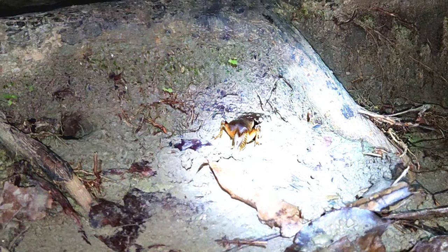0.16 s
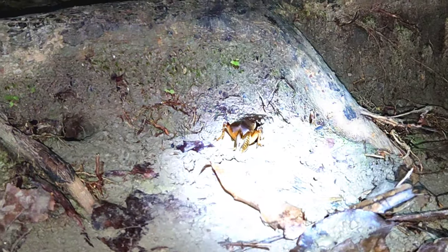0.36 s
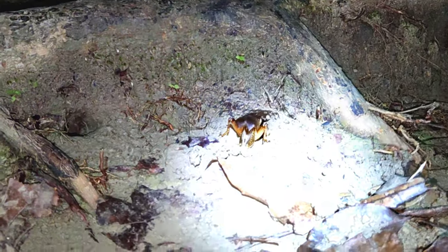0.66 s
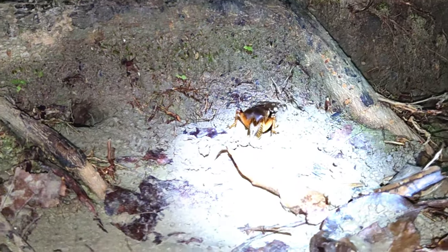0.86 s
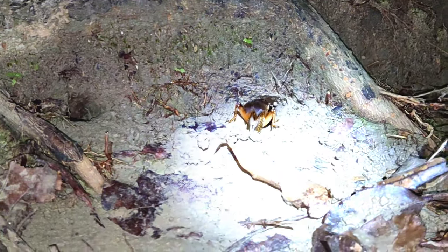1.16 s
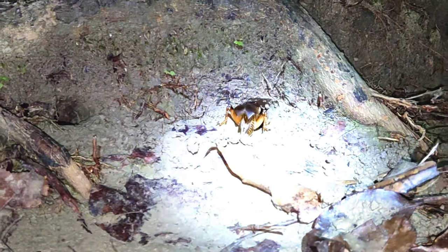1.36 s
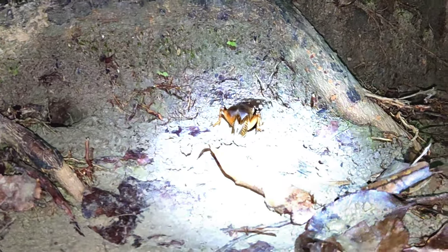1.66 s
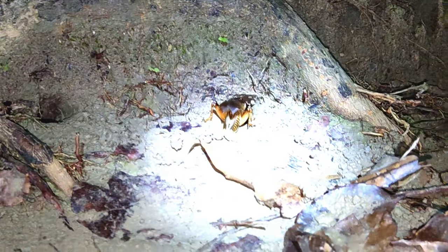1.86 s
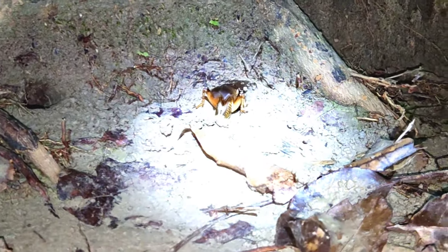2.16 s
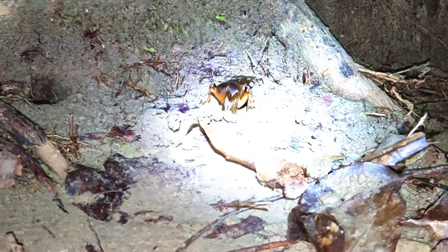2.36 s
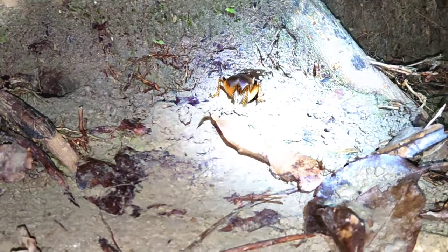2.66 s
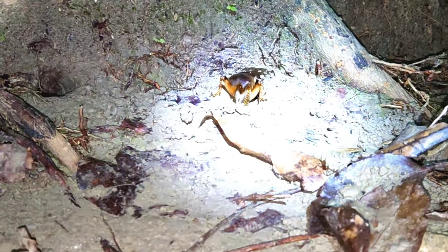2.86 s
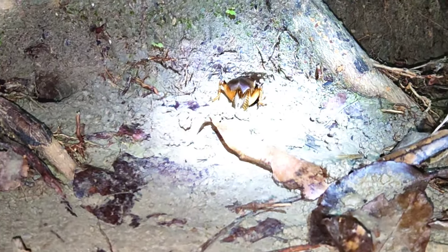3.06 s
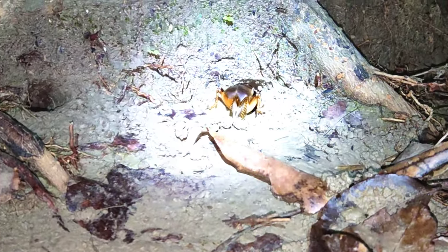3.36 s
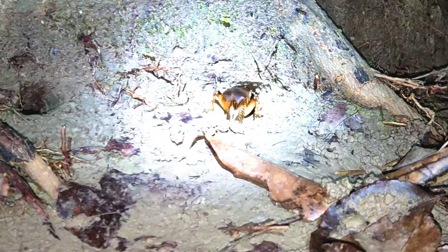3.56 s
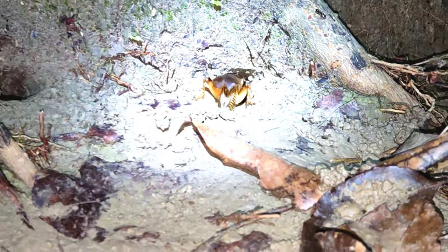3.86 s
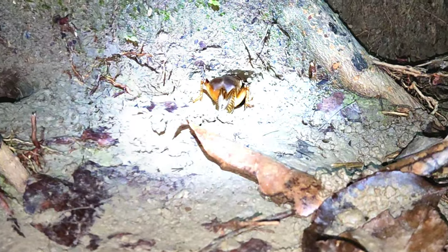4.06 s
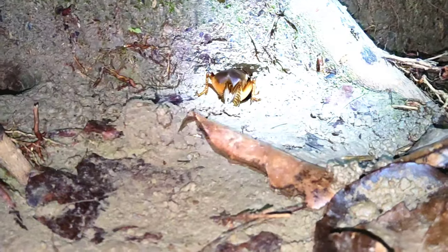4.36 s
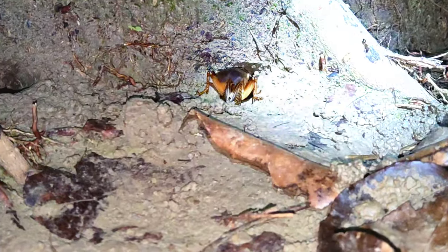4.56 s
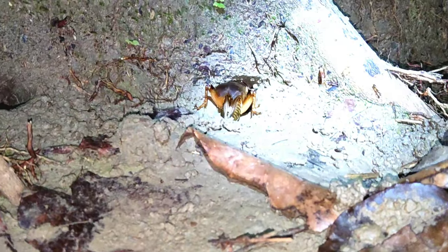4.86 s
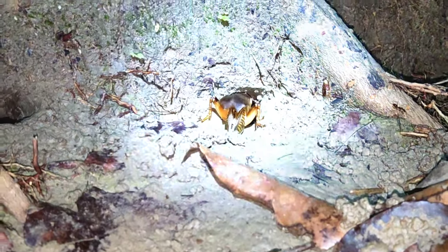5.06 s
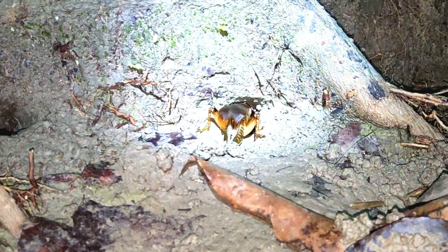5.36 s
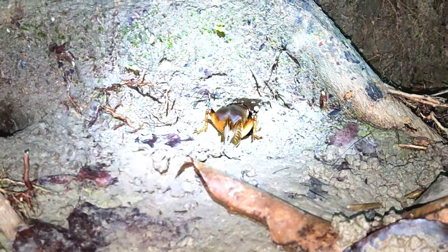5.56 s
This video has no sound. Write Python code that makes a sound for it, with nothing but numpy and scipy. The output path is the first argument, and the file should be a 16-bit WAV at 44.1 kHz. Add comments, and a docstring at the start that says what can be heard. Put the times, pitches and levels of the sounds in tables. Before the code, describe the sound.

From 0 seconds to the end at about 5.7 seconds, a mole cricket sings at its burrow on bare ground at night, very close to hand-held microphones. The song is a loud, unbroken, piercing buzz near 4 kHz, made of about 57 tiny falling chirps a second, too fast to separate, so it sounds like one rough, steady trill with a low hum at the wing-beat rate. Overload adds bright, fizzy overtones and a dry rasp. At about 0.75 to 0.82 seconds, three soft low thumps run together on the right as a brief bump with a short dull rustle. Faint bass flutter swells on the right around 1.4 and again around 4.5 seconds. The roughness varies subtly, slightly less even around 1.5 to 2.3 seconds, and the stereo balance drifts gently. Under it lie thin hiss and a faint, throbbing low rumble, a little stronger around 4 seconds. There is barely any echo.

```python
"""At the mouth of its burrow at night, a mole cricket sings very close to two hand-held microphones.
Each wing closing drags a scraper over a toothed file: a falling chirp near 4 kHz, 57 times a second.
Its song is a swept sine with noise for the scrape; soft clipping adds overtones and a low buzz.
On the right there are three soft low thumps and two spells of bass flutter, made of Gaussian pulses.
Decaying noise gives the song a short haze; filtered noise gives a thin hiss and a throbbing low rumble."""
import sys
import numpy as np
from scipy import signal
from scipy.fft import rfft, irfft, next_fast_len
from scipy.io import wavfile
from scipy.ndimage import map_coordinates

SR = 44100
rng = np.random.default_rng(int(sys.argv[2]) if len(sys.argv) > 2 else 0)


def unload_wav(signal):
    """Save mono or channel-first audio to the path in sys.argv[1] as 16-bit WAV at rate SR, clipped to [-1, 1]."""
    wavfile.write(
        sys.argv[1],
        SR,
        np.round(np.clip(np.atleast_2d(signal).T, -1, 1) * 32767).astype(np.int16),
    )


N = 251811

FIRST_STROKE_S = 0.0138
# the wing beat quickens a little as the song goes on
BEAT_HZ, BEAT_GAIN_HZ_PER_S = 57.06, 0.024


def amp(db):
    """Amplitude ratio of a level: 20 dB is a factor of ten."""
    return 10 ** (np.asarray(db) / 20)


def unit(x):
    """Normalization: x scaled to an rms of 1 over all its samples."""
    return x / np.sqrt(np.mean(x ** 2) + 1e-20)


def curves(rows, at):
    """Linear interpolation: each column after the first, read at the given values of the first."""
    position, *columns = np.transpose(rows)
    return [np.interp(at, position, column) for column in columns]


def filtered(x, response):
    """Linear filtering: the spectrum of x times a response of frequency in Hz."""
    size = next_fast_len(N + 8192)  # padded against wrap-around
    spectrum = rfft(x, size) * response(np.fft.rfftfreq(size, 1 / SR))
    return irfft(spectrum, size)[..., :N]


def noise(spectrum):
    """Spectral shaping: two unrelated Gaussian noises, joint rms 1, from rows of (Hz, relative dB)."""
    corner_hz, level_db = np.transpose(spectrum)

    def response(hz):
        return amp(np.interp(np.log(hz + 1), np.log(corner_hz), level_db))

    return unit(filtered(rng.standard_normal((2, N)), response))


def delayed(x, seconds):
    """Propagation delay: x read at earlier, fractional sample positions; the delay may move."""
    return map_coordinates(x, [np.arange(N) - seconds * SR], order=5, mode="nearest")


def strokes(t):
    """Phase accumulation of the beat rate: each sample's stroke number and age (s) in that stroke."""
    # how unevenly the scraper catches: time_s [s], scatter_ms [ms, standard deviation]
    slip = [(0, 0.06), (.3, 0.0062), (1.15, 0.0074), (1.55, 0.052), (2.3, .04), (2.7, 0.016), (5.7, .016)]
    beat_hz = BEAT_HZ + BEAT_GAIN_HZ_PER_S * t
    beats = np.cumsum(beat_hz) / SR
    beats += 1 - np.interp(FIRST_STROKE_S, t, beats)  # stroke 1 is due at FIRST_STROKE_S
    number = beats.astype(int)
    scatter = rng.standard_normal(number[-1] + 1)[number]
    late_ms = scatter * curves(slip, t)[0]
    return number, (beats - number) / beat_hz - late_ms / 1000


def cricket(t, pitch_scatter=0.0011, size_scatter_db=0.32, tail_scatter_db=0.87, rasp_db=-39,
            catch_db=-32, catch_s=0.0017, wing_low_hz=2900, wing_high_hz=4500):
    """Stridulation: tooth impacts drive the wings at the tooth rate; friction adds a tick and a rasp."""
    # one stroke, the scraper slowing along the file:
    # age_s [s since it catches], tooth_hz [Hz, mean], level_db [dB, relative]
    stroke = [(0, 3943, -38.5), (.0005, 3950, -8.5), (.0011, 3910, -2), (.0022, 3890, -1.6),
              (.0038, 3801, 1), (.0062, 3749, -1.78), (.008, 3657, -1), (.0095, 3596, -3),
              (.011, 3416, -12), (.0128, 3547, -16.5), (.015, 3634, -27.5), (.0175, 3584, -24.5)]
    # the singer's effort: time_s [s], effort_db [dB]
    effort_table = [(0, -0.82), (1.2, -1), (2.3, -0.03), (3, -0.72), (3.7, -1.04), (4.4, -1), (5.7, -0.68)]
    # scrape of the file: frequency_hz [Hz], level_db [dB per Hz, relative]
    rasp_spectrum = [(1000, -3), (2500, 4.5), (3600, 5), (5200, 13.5), (6300, 5), (8300, 12.5), (9500, 6),
                     (11500, -42), (12900, -54), (15000, -49), (16000, -58)]

    number, age = strokes(t)
    speed, size, tail = rng.standard_normal((number[-1] + 1, 3))[number].T

    # the tooth rate sums to a count of teeth passed, one cycle per tooth
    span = np.arange(-SR // 500, SR // 50) / SR
    teeth = np.cumsum(curves(stroke, span)[0]) / SR
    phase = 2 * np.pi * np.interp(age, span, teeth) * (1 + pitch_scatter * speed)

    # the scraper lets go a little differently each time
    release = np.clip(age / stroke[-3][0], 0, 1) ** 4
    scatter_db = size_scatter_db * size + tail_scatter_db * tail * release
    force = amp(curves(stroke, age)[1] + scatter_db)

    def wing_radiation(hz):
        """Small wings radiate little away from their resonance."""
        return (1 - np.exp(-(hz / wing_low_hz) ** 8)) / (1 + (hz / wing_high_hz) ** 20)

    song = filtered(force * np.sin(phase), wing_radiation)

    catch = np.exp(-(age / catch_s - 1) ** 2)
    tick_spectrum = [(2500, -19.5), (4200, -5.5), (5500, -7.0), (6500, -13), (9000, -9.5), (13000, -29)]
    tick = amp(catch_db) * catch * noise(tick_spectrum)
    rasp = amp(rasp_db) * force * noise(rasp_spectrum)
    effort = amp(curves(effort_table, t)[0])
    return effort * song, effort * (rasp + tick)


def flutter(t, width_s=0.0023):
    """Subharmonic pulsing: a dull pulse about the start of every second stroke, swelling in spells."""
    # spells of bass flutter: middle_s [s], half_length_s [s], peak_db [dB, relative]
    spells = [(1.36, 0.19, -37), (4.55, .3, -40)]
    number, age = strokes(t)
    # time from the nearest start of an odd-numbered stroke
    apart = np.where(number % 2, age, 1 / BEAT_HZ - age)
    swell = sum(amp(db) * np.exp(-((t - middle) / half) ** 2) for middle, half, db in spells)
    return -swell * np.exp(-(apart / width_s) ** 2)


def thumps(t, width_s=0.0011, rustle_db=-17, rustle_s=0.098):
    """Low thumps: short Gaussian pulses, each trailing an exponentially decaying low-frequency noise."""
    # soft low thumps: peak_s [s], peak_db [dB, relative]
    pulses = [(0.7498, -27), (0.7851, -31), (0.8203, -31)]
    pulse = sum(amp(db) * np.exp(-((t - s) / width_s) ** 2) for s, db in pulses)
    trail = sum(amp(db) * (t > s) * np.exp(-np.abs(t - s) / rustle_s) for s, db in pulses)
    rustle = noise([(25, 12), (150, 6.5), (700, -30.5), (2000, -42.5)])[0]
    return amp(rustle_db) * trail * rustle - pulse


def haze(song, t60_s=0.33):
    """Decaying noise convolution: a short haze fills the gaps between strokes, unlike at each microphone."""
    t = np.arange(SR // 2) / SR
    tail = rng.standard_normal((2, len(t))) * amp(-60 * t / t60_s)
    tail /= np.linalg.norm(tail, axis=1, keepdims=True)  # unit energy
    return signal.fftconvolve(song[None], tail, axes=1)[:, :N]


def background(t, air_db=-32.0, rumble_db=4.5, rumble_left_db=-5,
               throb_db=7, throb_s=0.005, throb_width_s=0.009):
    """Amplitude modulation of noise: a rumble throbs with the wing beat under a steady hiss."""
    # thin steady hiss: frequency_hz [Hz], level_db [dB per Hz, relative]
    hiss_spectrum = [(300, -11), (1600, -11.5), (2600, -5), (3300, 13.5), (5000, 6), (6200, -6), (7600, 10),
                     (9400, -5), (11200, 6.5), (12200, -13), (13000, -41), (14700, -1), (15900, -17)]
    # low rumble: frequency_hz [Hz], level_db [dB per Hz, relative]
    rumble_spectrum = [(20, -4), (35, -1), (90, 7.5), (150, 5.5), (220, -1.5), (500, -2), (850, -1.5),
                       (1300, -10.5), (2200, -27), (4000, -47)]
    # course of the rumble: time_s [s], level_db [dB, relative]
    rumble_course = [(0.1, -60), (0.73, -56.5), (0.74, -51), (0.88, -55.5), (2.49, -55), (2.9, -57.5),
                     (4.07, -52), (5.6, -56)]
    age = strokes(t)[1]
    throb = throb_db * np.exp(-((age - throb_s) / throb_width_s) ** 2)
    rumble = amp(rumble_db + curves(rumble_course, t)[0] + throb) * noise(rumble_spectrum)
    sides = amp([[rumble_left_db], [0]])  # stronger on the right
    return amp(air_db) * noise(hiss_spectrum) + rumble * sides


def scene(song_db=4, left_db=-3, ground_echo=0.083, haze_db=-34):
    """Superposition: the song leads on the left, joined there by a bounce off the ground."""
    # the swaying microphones: time_s [s], left_lead_ms [ms], left_extra_db [dB]
    sway = [(0, .076, 0.5), (1.25, 0.065, 1.16), (2, 0.075, -0.5), (2.3, 0.1, 0), (2.8, 0.082, 1),
            (3.85, 0.069, 0.5), (4.3, 0.084, 2), (5.2, 0.078, -0.7), (5.7, .1, -3.5)]
    t = np.arange(N) / SR
    song, scrape = cricket(t)
    lead_ms, balance_db = curves(sway, t)
    bounce = delayed(song, 0.0024)
    left = amp(left_db + balance_db) * delayed(song + ground_echo * bounce, -lead_ms / 1000)
    right = song + thumps(t) + flutter(t)
    near = np.array([left, right]) + scrape
    return amp(song_db) * (near + amp(haze_db) * haze(song)) + background(t)


def overload(x, lopsided, top=1.0, hardness=5, skew_power=8):
    """Saturation: peaks flatten symmetrically; an even power law gives the lopsided part."""
    fine = signal.resample_poly(x, 4, 1)  # fourfold rate limits aliasing
    flat = fine / (1 + np.abs(fine / top) ** hardness) ** (1 / hardness)
    skew = lopsided * np.abs(flat / top) ** skew_power
    return signal.resample_poly(flat, 1, 4), signal.resample_poly(skew, 1, 4)


def record(dry, buzz_top_hz=900, coupling_hz=55, fizz_db=11, mirror_db=-5, mirror_width_hz=1000, top_hz=15900):
    """Harmonic distortion in the microphones, then a bass cut, a mirrored treble and a band limit."""
    # the low buzz wavers: time_s [s], level_db [dB]
    buzz_course = [(0, -3.5), (1.5, -3.5), (2.3, -5), (3.1, -5.5), (3.9, -2), (4.6, -5.5), (5.2, -3),
                   (5.7, -1.5)]
    # even overtones: time_s [s], level_db [dB]
    even_course = [(0, -1.5), (3.2, -0.5), (4, 1.5), (5.7, 2)]
    t = np.arange(N) / SR
    # the two microphones lean opposite ways
    left = overload(dry[0], lopsided=-0.038)
    right = overload(dry[1], lopsided=0.18)
    flat, skew = np.stack([left, right], axis=1)

    # lopsided peaks give a low buzz at the wing beat and even harmonics with a bright fizz on top
    buzz = amp(curves(buzz_course, t)[0]) * filtered(skew, lambda hz: 1 / (1 + 1j * hz / buzz_top_hz))
    even_hz = [3000, 5000, 12000, 13000, 15300, 15900]
    even_db = [-60, 0, 0, -6, fizz_db, 0]
    even = filtered(skew, lambda hz: amp(np.interp(hz, even_hz, even_db)))
    even = amp(curves(even_course, t)[0]) * even
    sound = filtered(flat + buzz + even, lambda hz: 1j * hz / (coupling_hz + 1j * hz))

    # the third harmonic folds about a quarter of the sample rate: alternating signs mirror the band
    near_fold = filtered(sound, lambda hz: np.exp(-((hz - SR / 4) / mirror_width_hz) ** 4))
    sound = sound + amp(mirror_db) * near_fold * (-1) ** np.arange(N)
    return filtered(sound, lambda hz: hz < top_hz)


dry = scene()
out = record(dry)
unload_wav(out)
```